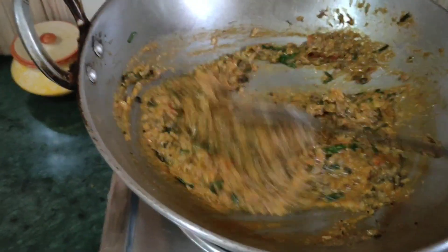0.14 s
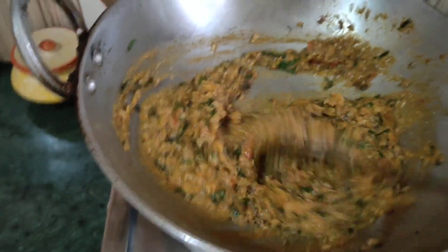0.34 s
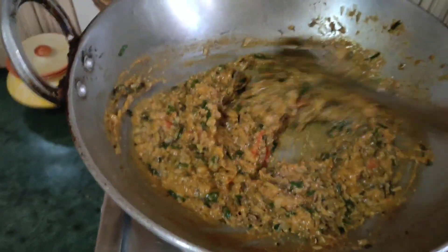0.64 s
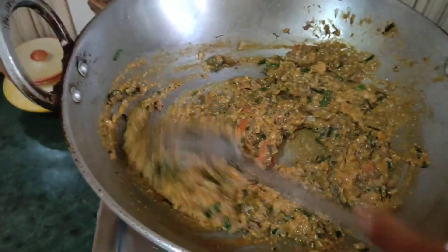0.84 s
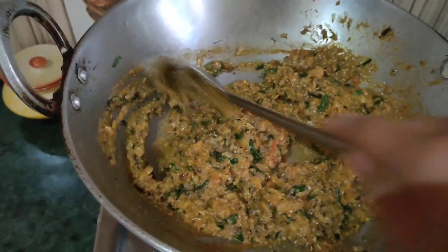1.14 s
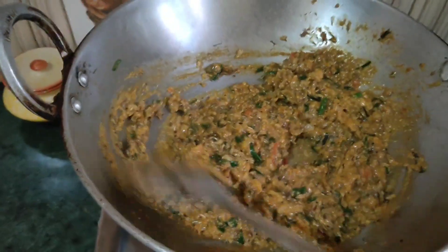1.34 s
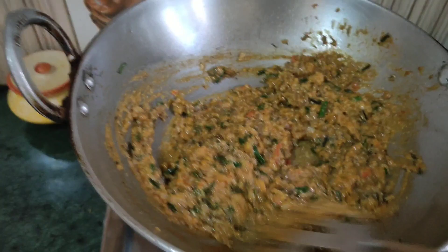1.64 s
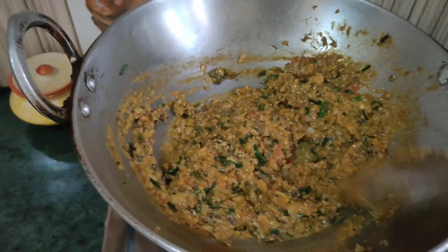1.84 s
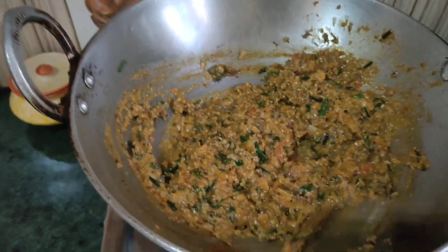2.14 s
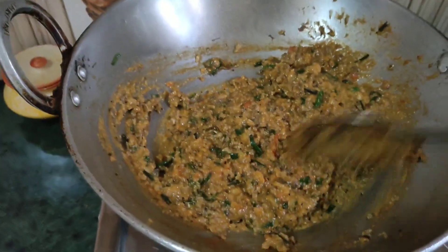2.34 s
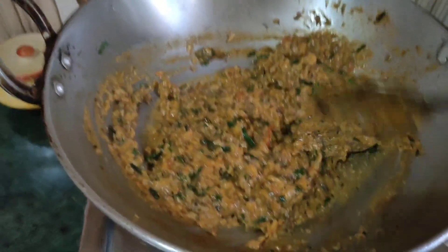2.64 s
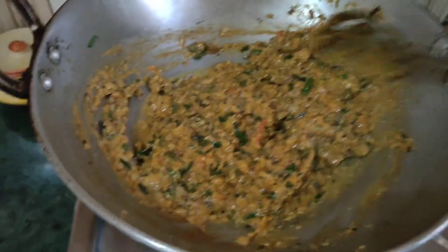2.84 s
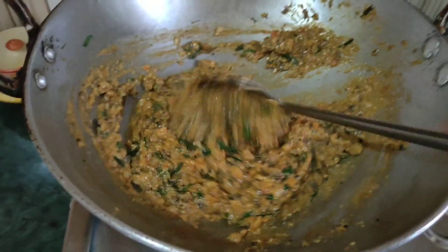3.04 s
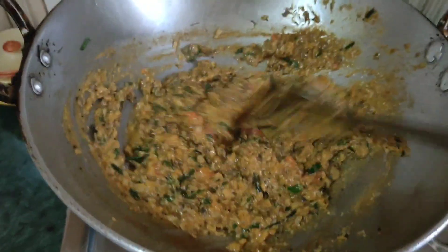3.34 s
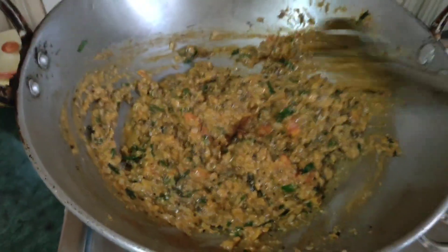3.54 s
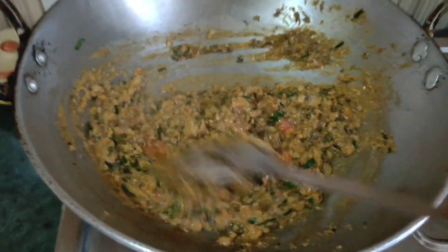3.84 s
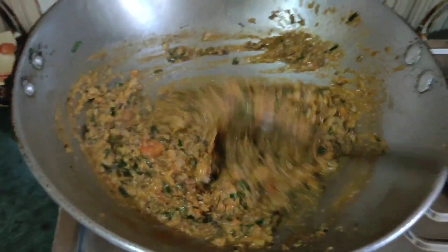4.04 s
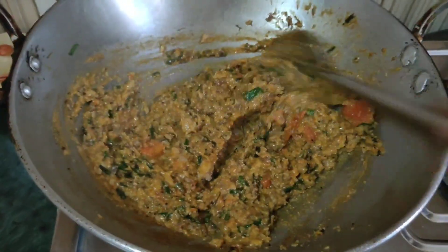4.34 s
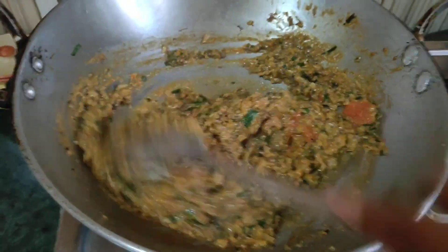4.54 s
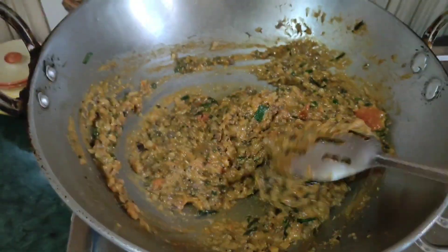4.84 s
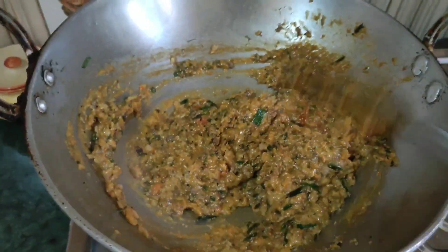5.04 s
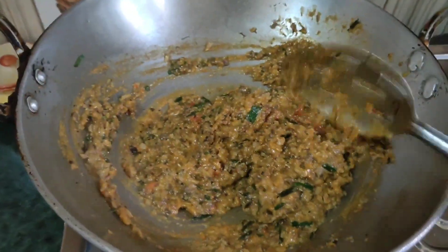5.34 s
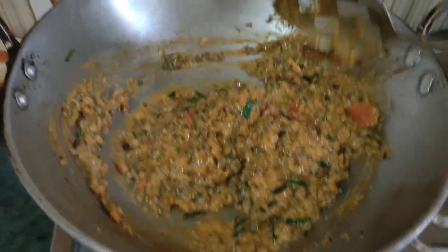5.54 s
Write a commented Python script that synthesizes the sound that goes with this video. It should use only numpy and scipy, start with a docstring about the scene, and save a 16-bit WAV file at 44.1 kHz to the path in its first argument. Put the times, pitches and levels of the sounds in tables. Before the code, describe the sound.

A steel spatula stirs thick food in a metal wok, heard close up in a small kitchen with hard walls. A faint sizzle with tiny pops runs throughout, along with dull, wet squelches as the food is pushed over. A soft pat comes at about 0.3 seconds. At 0.6 the blade clacks against the pan, which rings briefly, and then rasps along the metal. Sharp clacks follow at 1.5, 1.9 and 2.3 seconds, with a bright scrape at 1.6 and a low bump on the right at 1.9. Lighter taps and short scrapes continue from 2.7 to 4.4 seconds, with one sharper click at 3.4. The loudest moment is three quick, ringing clanks between 4.6 and 4.9 seconds, over a heavier shove of wet food. A short scrape at 5.2 and one more clack near 5.5 seconds finish the stirring.

```python
"""Clacks, ringing and scrapes: a slotted steel spatula stirs thick food in a metal wok.
Each blow of the blade sets the pan ringing in a small, hard-walled kitchen. Between blows the
blade rasps along the bowl, sticking and slipping. Underneath, wet food squelches and tiny steam
bubbles sizzle faintly. A soft pat on the food comes before the first blow, and one blow comes
with a low bump on the right."""
import sys
import numpy as np
from scipy import signal
from scipy.fft import rfft, irfft, next_fast_len
from scipy.io import wavfile

SR = 44100
rng = np.random.default_rng(int(sys.argv[2]) if len(sys.argv) > 2 else 0)


def generate_wav(signal):
    """Clip the signal to [-1, 1] and save it as 16-bit WAV at the path in sys.argv[1]."""
    frames = np.transpose(np.atleast_2d(signal))
    scaled = np.clip(frames, -1, 1) * 32767
    pcm = np.round(scaled).astype(np.int16)
    wavfile.write(sys.argv[1], SR, pcm)


N = 250488
TIME = np.arange(N) / SR

# The blade hits the pan. Weight is the shove that moves the bowl, edge the bite of metal on metal.
# The notes depend on the spot that is hit. A fade is always the time to fall by 60 dB.
# start_s, weight_db, edge_db, chatter_fade_s, bowl_hz, blade_low_hz, blade_high_hz, left_over_right_db
BLOWS = [(0.6011, -37.5, -24.5, 0.12, 744, 1030, 6270, -3.5), (1.136, -44.5, -54, .03, 370, 1160, 6960, 3),
         (1.5414, -36.5, -18.5, 0.11, 394, 2340, 7480, 2.5),
         (1.905, -38, -17.5, 0.033, 285, 2890, 6080, 5.5),
         (2.284, -36, -25.5, 0.039, 616, 1156, 5700, -0.5),
         (2.688, -42.5, -48.5, 0.058, 363, 1030, 6100, -1), (2.9852, -44, -35.5, 0.037, 270, 1200, 6400, 3),
         (3.212, -58.5, -53.5, 0.039, 362, 1140, 7300, -2),
         (3.4093, -38, -23, 0.027, 450, 2010, 6540, -1.6),
         (3.4826, -47.5, -32.5, .075, 387, 1090, 6350, -1.5),
         (3.779, -48, -51.5, 0.046, 283, 2170, 6470, 1), (4.2, -47, -54.5, 0.06, 380, 880, 6200, 1),
         (4.3472, -53.5, -53, .06, 263, 3480, 6800, 0), (4.4025, -47, -36.5, 0.028, 270, 3560, 6600, 2.5),
         (4.4277, -36, -40.5, .11, 265, 1200, 6600, 1), (4.6008, -24, -21, .14, 260, 1130, 6630, -2),
         (4.7456, -24, -23, 0.17, 362, 1210, 6650, 1.5), (4.872, -30, -25, 0.093, 622, 1770, 6950, 5.5),
         (5.165, -46.5, -50.5, 0.075, 278.4, 1150, 5100, -4),
         (5.4689, -37.5, -29, 0.05, 277, 1190, 6200, -3)]
# The blade slides along the bowl: start_s, swell_s, hold_s, middle_db, treble_db, pressed_pitch_hz
STROKES = [(0.635, 0.061, 0.055, -42, -42, 1530), (0.738, 0.057, 0.032, -40.5, -35, 2330),
           (1.06, 0.083, 0.051, -47.5, -52, 1730), (1.162, 0.022, 0.017, -49.5, -38, 1630),
           (1.626, 0.025, 0.014, -35, -27.5, 1900), (1.923, 0.027, 0.048, -44.5, -31, 1940),
           (3.039, 0.046, 0.011, -45, -43.5, 1120), (3.804, 0.049, 0.01, -43.5, -45, 1490),
           (4.452, 0.06, 0.037, -45.5, -53, 1220), (5.203, 0.034, 0.043, -49, -37.5, 1820),
           (5.597, 0.021, 0.012, -55, -47, 2240)]
# The wok's own ringing notes (its modes): pitch_hz, level_db, fade_s
WOK_NOTES = [(180.6, -11, 0.98), (218.3, -14, 0.16), (267.6, 4, 0.39), (304.3, -12.5, 1),
             (386.7, 0.5, 0.52), (415.7, 0.5, 0.39), (496.6, -7.5, 0.51), (645, -4, 0.64),
             (772, -7.5, 0.65), (857, -4, 0.36), (1040, 6, 0.32), (1156, 1.5, 0.61), (1320, -15, .28),
             (1560, -19, 0.28), (1865, 2.5, 0.59), (2166, 7.5, 0.29), (2290, 6, 0.3), (2900, -6, 0.45),
             (3030, 0.5, 0.32), (5190, -5, 0.27), (5240, 0, 0.083), (5670, -28, .28), (6000, -19, 0.16),
             (6300, -15, 0.24), (6400, -8, 0.47), (6780, -6, 0.42), (6870, 1.5, 0.22)]
# A heap of food is shoved over: peak_s, level_db
SHOVES = [(1.32, -60), (1.82, -53.5), (2.852, -62.5), (3.63, -52.5), (4.77, -42), (5.35, -54),
          (5.62, -57.5)]
# How the sizzle rises and falls: time_s, level_db
SIZZLE_LEVELS = [(0.0, -55), (0.47, -58.5), (1.0, -53), (1.45, -60), (2.05, -54.5), (2.6, -59), (2.85, -55),
                 (3.35, -59.5), (3.7, -56), (5.1, -61.5), (5.68, -55.5)]

# Tone colours, or how strong each sound is from low to high: frequency_hz, level_db
CLACK_COLOUR = [(88, -5), (150, -22), (376, 12.5), (601, -1.5), (979, -5.5), (2020, -3), (3040, -5),
                (3840, -11.5), (6910, -2.5), (8400, -12.5), (14000, -25), (15100, -14), (16000, -37)]
LOW_RING_COLOUR = [(50, -32), (100, -14), (170, -11.5), (266, -3), (330, -3), (416, 2.5), (530, -5.5),
                   (635, -2), (900, -1), (1500, 12.5)]
HIGH_RING_COLOUR = [(500, -42), (1000, -6.5), (1600, -7.5), (2300, -2.5), (3000, 0), (3900, -8),
                    (4700, 3.5), (5600, 2.5), (6400, 1.5), (7100, 1.5), (8200, -4), (10000, -16.5),
                    (12500, -20), (15500, -22)]
SCRAPE_COLOUR = [(700, -14), (1100, 8), (1600, -7), (2300, 0.5), (3000, -4), (3800, -10.5), (4700, -2.5),
                 (5600, 3.5), (6400, 10.5), (7200, 8), (8200, -6.5), (10000, -14), (12500, -18),
                 (15500, -21)]
CHURN_COLOUR = [(30, -49), (60, -1.5), (90, 10.5), (180, -1), (280, 7), (420, 4.5), (600, 0.5), (1200, -8),
                (2300, -11.5), (4000, -14.5), (9000, -74)]
SIZZLE_COLOUR = [(300, -10.5), (1000, -1.5), (2000, -3), (3000, -5), (4000, -14.5), (5000, -6.5),
                 (6000, -2), (7000, 1), (8200, -11.5), (10000, -15), (13000, -18.5), (15500, -16.5)]
# How alike left and right are, in the room and close up (1 is the same): frequency_hz, likeness
ROOM_LIKENESS = [(60, 0.77), (290, 0.97), (640, 0.42), (1400, 0.18), (3000, 0.11), (7000, 0)]
NEAR_LIKENESS = [(200, 0.89), (1000, 0.38), (3000, 0.072), (7000, 0.017)]

# Three bands of pitch, called body, middle and treble: low_hz, high_hz
BANDS = [(40, 800), (800, 4000), (4000, 17000)]
# How long the wash of echoes takes to fade: body_s, middle_s, treble_s
WASH_FADES = [0.53, 0.48, 0.38]
# For body, middle and treble: the share that follows a blow's edge rather than its weight, and a gain
CLACK_EDGE_SHARE, CLACK_GAIN_DB = [0, 0.89, 1], [-1.5, -2.5, 1]
RING_EDGE_SHARE, RING_GAIN_DB = [0, 0.54, 0.91], [0.05, -10, -8.5]


def spatula_blows():
    """Every blow is a close clack followed by the ring of pan and room."""
    out = np.zeros((2, N))
    for start_s, weight_db, edge_db, fade_s, bowl_hz, low_hz, high_hz, side_db in BLOWS:
        clack_db = band_levels(weight_db, edge_db, CLACK_EDGE_SHARE, CLACK_GAIN_DB)
        ring_db = band_levels(weight_db, edge_db, RING_EDGE_SHARE, RING_GAIN_DB)
        clack = blade_clack(low_hz, high_hz, fade_s, clack_db)
        ring = pan_ring((bowl_hz, low_hz, high_hz), ring_db)
        balance = from_db([[side_db / 2], [-side_db / 2]])
        add(out, contact_brightness(clack, edge_db) * balance, start_s)
        add(out, contact_brightness(ring, edge_db), start_s)
    return out


def blade_clack(low_hz, high_hz, fade_s, levels_db, note_db=6.5, rise_s=0.00076):
    """The blade chatters briefly where it lands, sounding two short notes."""
    t = np.arange(SR // 10) / SR
    noise = rng.standard_normal((2, len(t)))
    chatter = coloured(noise, CLACK_COLOUR, NEAR_LIKENESS, ripple_db=2.5, spacing_hz=217.7)
    first_touch = dying(t, fade_s / 4)   # the first contact is the hardest
    chatter = chatter * (first_touch + dying(t, fade_s)) * (1 - np.exp(-t / rise_s))
    notes = resonate(chatter, low_hz, width_hz=240) + resonate(chatter, high_hz, width_hz=450)
    blade = chatter + from_db(note_db) * notes
    parts = [in_band(blade, band) for band in BANDS]
    return sum(from_db(db) * part / np.std(part[:, :SR // 100]) for part, db in zip(parts, levels_db))


def pan_ring(notes_hz, levels_db, wok_db=-5.5, build_s=0.011):
    """The wok's main notes sound over a wash of small ones and echoes; one note stands out per band."""
    t = np.arange(SR * 3 // 4) / SR
    early = slice(SR // 66, SR // 16)   # levels are set on this early part of the ring
    bowl, blade = (LOW_RING_COLOUR, 6.0, 45), (HIGH_RING_COLOUR, 5.0, 220)
    voices = [bowl, blade, blade]
    out = 0
    for band, voice, note_hz, fade_s, db in zip(BANDS, voices, notes_hz, WASH_FADES, levels_db):
        colour, note_db, width_hz = voice
        noise = rng.standard_normal((2, len(t)))
        wash = coloured(noise, colour, ROOM_LIKENESS, ripple_db=4.5, spacing_hz=59.94)
        wash = wash + from_db(note_db) * resonate(wash, note_hz, width_hz)
        wash = in_band(wash, band) * dying(t, fade_s)
        wok = wok_notes(t, band)
        part = wash / np.std(wash[:, early]) + from_db(wok_db) * wok / np.std(wok[:, early])
        out = out + from_db(db) * part / np.std(part[:, early])
    return out * (1 - np.exp(-t / build_s))


def wok_notes(t, band, scatter_db=2.0):
    """The wok's main notes within one band, each struck with a strength of its own."""
    hz, level_db, fade_s = np.transpose([note for note in WOK_NOTES if band[0] < note[0] <= band[1]])
    strength = from_db(level_db + scatter_db * rng.standard_normal(len(hz)))
    # High notes reach the two sides out of step.
    apart = np.arccos(np.clip(at_hz(ROOM_LIKENESS, hz), -1, 1)) * rng.choice([-1, 1], len(hz))
    phase = rng.uniform(0, 2 * np.pi, len(hz)) + np.outer([0, 1], apart)
    angle = np.outer(2 * np.pi * hz, t).astype(np.float32)
    fade = dying(t, fade_s[:, None])
    sines, cosines = np.sin(angle) * fade, np.cos(angle) * fade
    return (strength * np.cos(phase)) @ sines + (strength * np.sin(phase)) @ cosines


def band_levels(weight_db, edge_db, edge_share, gain_db):
    """The body follows a blow's weight, the treble its edge, and the middle lies between."""
    return weight_db + np.multiply(edge_share, edge_db - weight_db) + gain_db


def contact_brightness(sound, edge_db, split_hz=8600, db_per_db=0.33, neutral_edge_db=-18.0):
    """Harder blows make shorter contacts, so they keep more of the highest treble."""
    top = signal.sosfilt(signal.butter(2, split_hz, "high", fs=SR, output="sos"), sound)
    rest = signal.sosfilt(signal.butter(2, split_hz, "low", fs=SR, output="sos"), sound)
    top_gain = from_db(db_per_db * (edge_db - neutral_edge_db))
    return rest - top_gain * top   # the minus joins the two halves without a dip


def blade_scrapes(spots_per_s=22, release_fade_s=0.28, bend_octaves=0.1, note_db=5.5):
    """The edge sticks and slips on the metal, and the blade's note rises as it is pressed down."""
    slips = clicks(per_s=6000, spread_db=0.5)
    out = np.zeros((2, N))
    for start_s, swell_s, hold_s, middle_db, treble_db, pressed_hz in STROKES:
        during = (TIME >= start_s) & (TIME < start_s + .5)
        t = TIME[during] - start_s
        pressure = np.minimum(t / swell_s, 1)
        since_lift_s = np.maximum(t - swell_s - hold_s, 0)
        loudness = pressure * dying(since_lift_s, release_fade_s)
        rasp = 0
        for spot in range(12):   # each spot along the way rings with different small notes
            nearness = np.maximum(1 - np.abs(t * spots_per_s - spot), 0)
            here = coloured(slips[:, during], SCRAPE_COLOUR, ROOM_LIKENESS, ripple_db=7.5, spacing_hz=90)
            rasp = rasp + nearness * here
        pitch_hz = pressed_hz * 2 ** (bend_octaves * (pressure - 1))
        rasp = rasp + from_db(note_db) * resonate_gliding(rasp, pitch_hz, width_hz=800)
        for band, level_db in zip(BANDS[1:], (middle_db, treble_db)):
            out[:, during] += loudness * from_db(level_db) * rms_one(in_band(rasp, band))
    return out


def low_bump(at_s=1.9098, width_s=0.0012, push_db=-13.5, hum_hz=98.3, hum_db=-33.5, swell_s=0.1):
    """A single low push and pull, mostly on the right, then a hum that swells and dies."""
    offset = (TIME - at_s) / width_s
    push = from_db(push_db) * offset * np.exp((1 - offset ** 2) / 2)
    age_s = np.maximum(TIME - at_s, 0)
    swell = (age_s / swell_s * np.exp(1 - age_s / swell_s)) ** 4
    hum = from_db(hum_db) * swell * np.sin(2 * np.pi * hum_hz * age_s)
    return (push + hum) * from_db([[-30], [0]])   # left, right


def food_churn(shove_width_s=0.11, settling_db=-60.5, lumpy_db=1.6):
    """Wet lumps churn dully against the bowl, swelling with each shove."""
    shoves = sum(from_db(db) * np.exp(-((TIME - peak_s) / shove_width_s) ** 2) for peak_s, db in SHOVES)
    lumps = coloured(clicks(per_s=1800, spread_db=2.45), CHURN_COLOUR, ROOM_LIKENESS)
    return lumps * (from_db(settling_db) + shoves) * from_db(lumpy_db * drift(per_s=22))


def food_sizzle(gain_db=3.0, flicker_db=1.76):
    """Tiny steam bubbles burst in the oil, making a faint hiss with small pops."""
    bursts = rng.standard_normal((2, N)) + from_db(-6) * clicks(per_s=260, spread_db=2.2)
    sizzle = coloured(bursts, SIZZLE_COLOUR, ROOM_LIKENESS)
    level_db = np.interp(TIME, *np.transpose(SIZZLE_LEVELS)) + flicker_db * drift(per_s=40)
    return sizzle * from_db(level_db + gain_db)


def food_pat(start_s=0.255):
    """The blade pats the food once: a dull, cushioned tap that leaves no ring."""
    out = np.zeros((2, N))
    add(out, blade_clack(low_hz=420, high_hz=680, fade_s=0.031, levels_db=(-52, -62, -75)), start_s)
    return out


def coloured(pair, colour, likeness, ripple_db=0.0, spacing_hz=70):
    """Turn two unrelated signals into stereo with this tone colour and left-right likeness."""
    size = next_fast_len(pair.shape[1])
    hz = np.arange(size // 2 + 1) * SR / size
    # Many small, crowded notes make the colour uneven.
    ripple = np.interp(hz / spacing_hz, np.arange(1024), np.clip(rng.standard_normal(1024), -2, 2))
    mid, side = rfft(pair, size) * from_db(at_hz(colour, hz) + ripple_db * ripple)
    alike = np.clip(at_hz(likeness, hz), -.99, .99)
    both = np.sqrt(1 + alike) * mid + np.sqrt(1 - alike) * side * np.array([[1], [-1]])
    return rms_one(irfft(both, size)[:, :pair.shape[1]])


def clicks(per_s, spread_db):
    """Random clicks of unequal size, each with its own strength on the left and on the right."""
    happens = rng.random(N) < per_s / SR
    sizes = from_db(spread_db * np.minimum(rng.exponential(1, N), 4))
    return rms_one(happens * sizes * rng.standard_normal((2, N)))


def resonator(hz, width_hz):
    """The numbers for a filter that rings at one pitch, with gain 1 at its peak."""
    r = np.exp(-np.pi * width_hz / SR)
    return [(1 - r * r) / 2, 0, (r * r - 1) / 2], [1, -2 * r * np.cos(2 * np.pi * hz / SR), r * r]


def resonate(x, hz, width_hz):
    """Pick one steady note out of a sound."""
    return signal.lfilter(*resonator(hz, width_hz), x)


def resonate_gliding(x, hz, width_hz):
    """Pick out a note whose pitch moves in short steps."""
    out, state = np.zeros_like(x), np.zeros((2, 2))
    for i in range(0, len(hz), 256):
        step = slice(i, i + 256)
        out[:, step], state = signal.lfilter(*resonator(hz[i], width_hz), x[:, step], zi=state)
    return out


def in_band(x, band):
    """Keep the part of a sound between two frequencies."""
    return signal.sosfilt(signal.butter(4, band, "band", fs=SR, output="sos"), x)


def drift(per_s):
    """A smooth random wander, roughly between -1 and 1."""
    points = rng.standard_normal(4096)
    return np.interp(TIME * per_s, np.arange(len(points)), points)


def dying(t, fade_s):
    """A fade that falls by 60 dB every fade_s seconds."""
    return np.exp(-np.log(1000) * t / fade_s)


def at_hz(table, hz):
    """Read a table between its rows, by frequency."""
    row_hz, values = np.transpose(table)
    return np.interp(np.log(np.maximum(hz, 1)), np.log(row_hz), values)


def from_db(db):
    """Turn decibels into a number to multiply by."""
    return 10 ** (np.asarray(db) / 20)


def rms_one(x):
    """Scale a sound to an average strength (rms) of 1."""
    return x / np.sqrt(np.mean(x ** 2) + 1e-20)


def add(out, sound, start_s):
    """Mix a sound in at the given time."""
    at = round(start_s * SR)
    out[:, at:at + sound.shape[1]] += sound[:, :N - at]


def scene():
    """The spatula and wok in front, the food underneath."""
    return spatula_blows() + blade_scrapes() + low_bump() + food_churn() + food_sizzle() + food_pat()


def record(dry):
    """Round off the highest peaks and cut steeply above 16200 Hz."""
    rounded = .9 * np.tanh(dry / .9)
    return signal.sosfilt(signal.ellip(10, .1, 80, 16200, fs=SR, output="sos"), rounded)


dry = scene()
out = record(dry)
generate_wav(out)
```